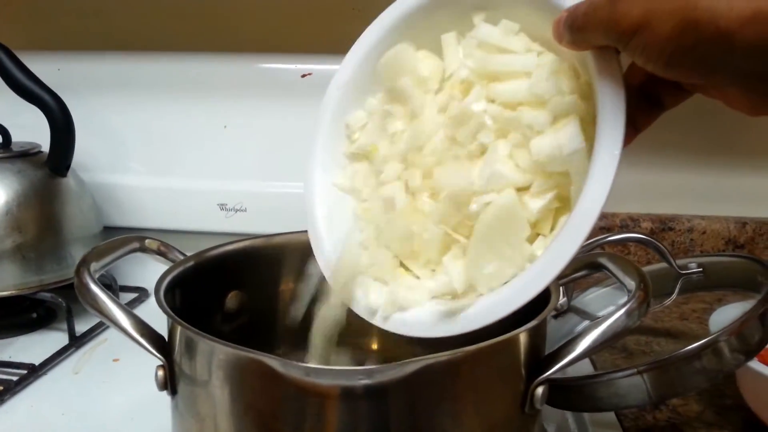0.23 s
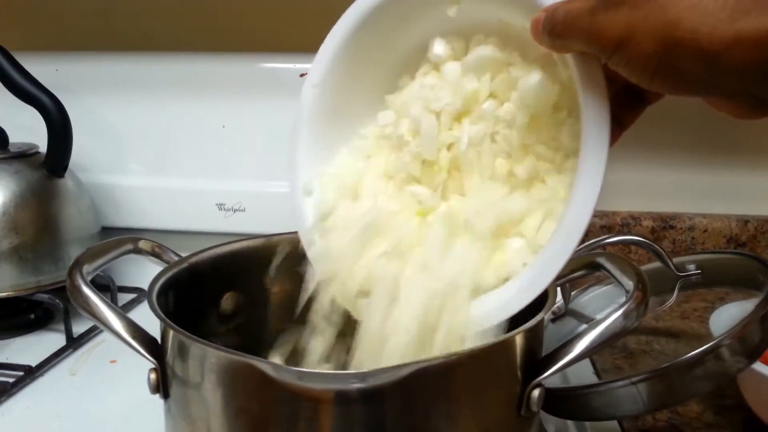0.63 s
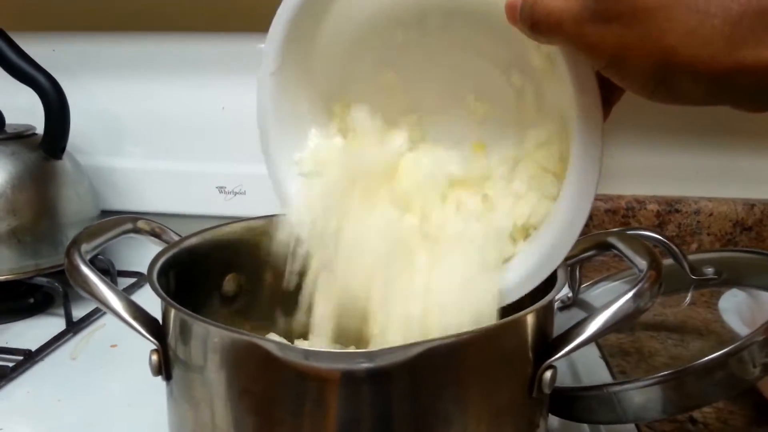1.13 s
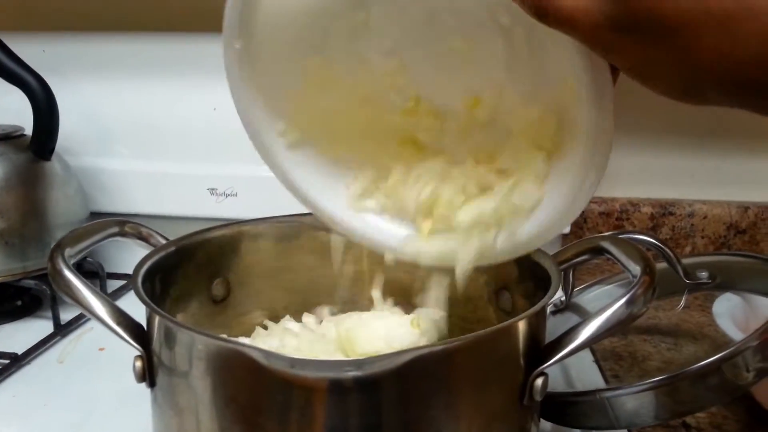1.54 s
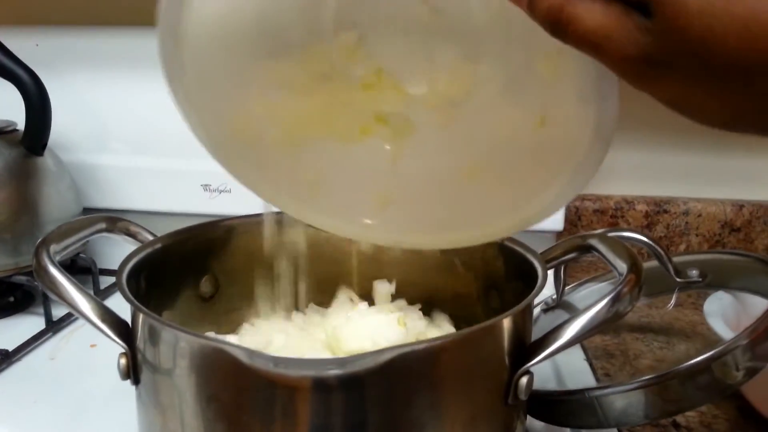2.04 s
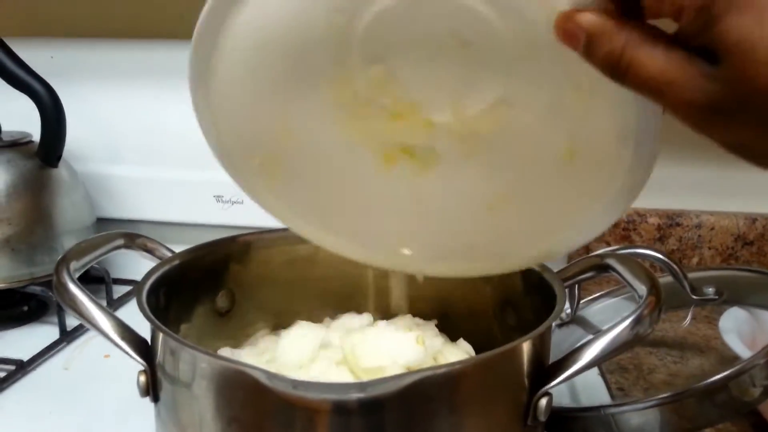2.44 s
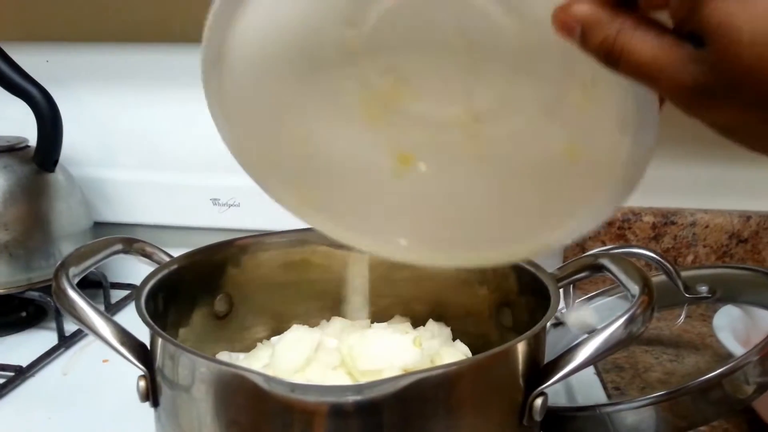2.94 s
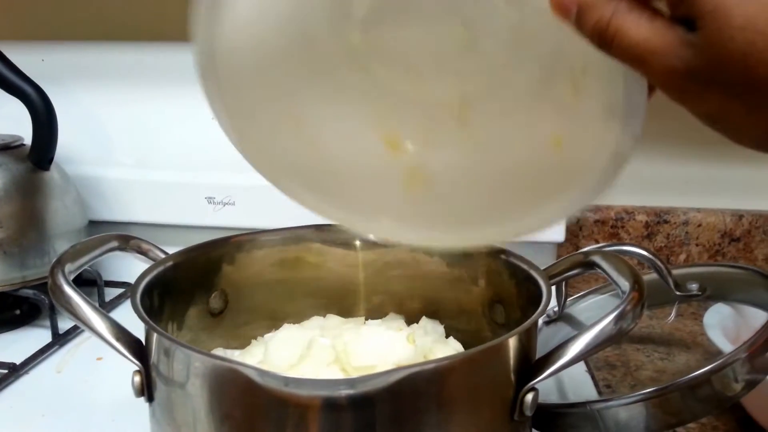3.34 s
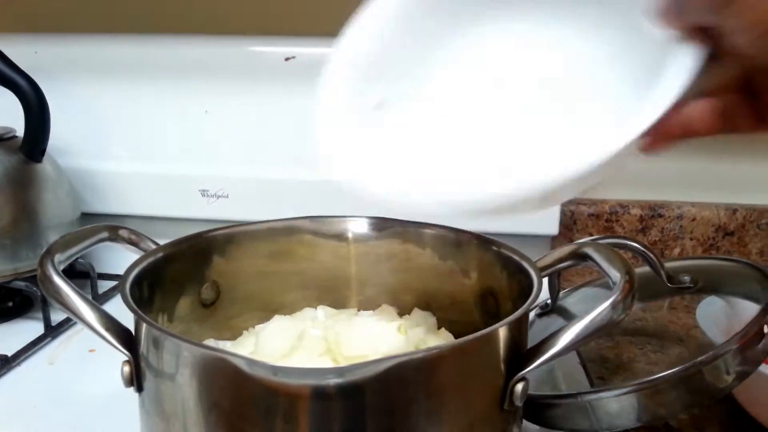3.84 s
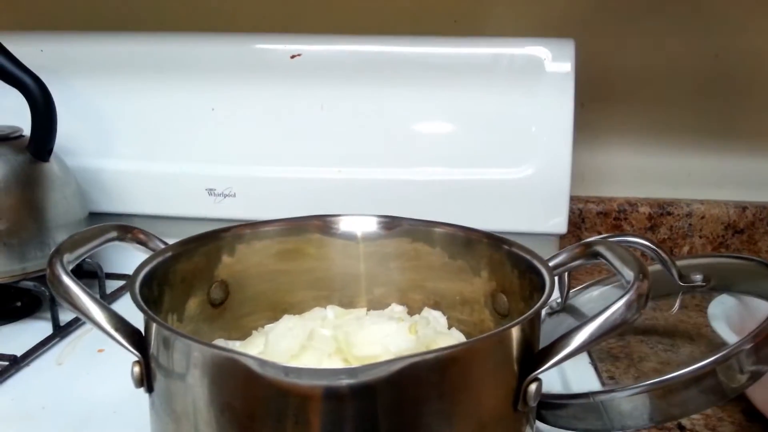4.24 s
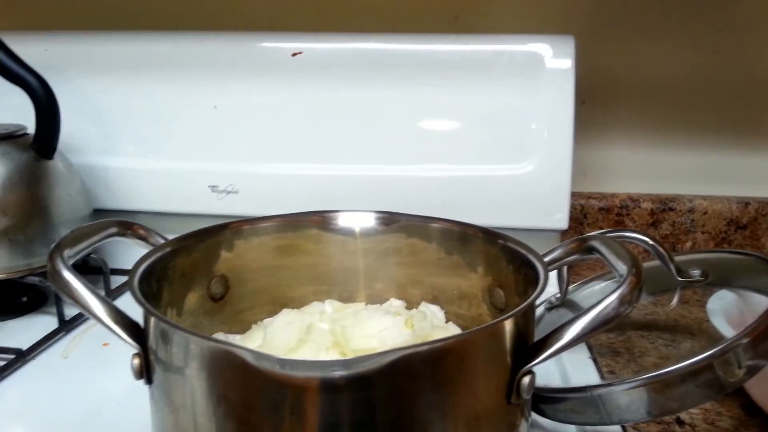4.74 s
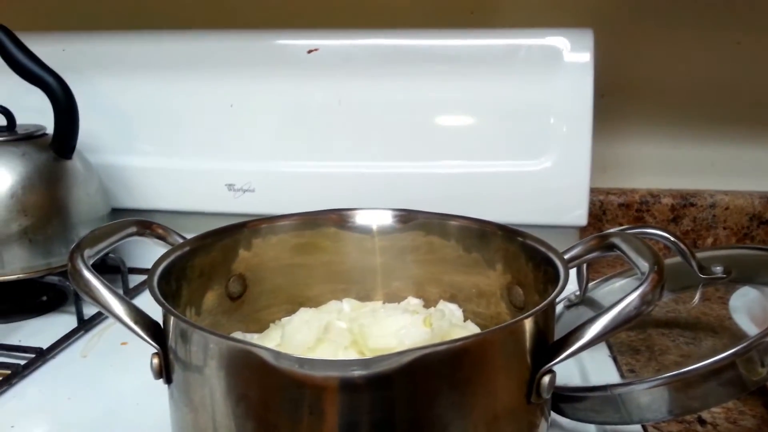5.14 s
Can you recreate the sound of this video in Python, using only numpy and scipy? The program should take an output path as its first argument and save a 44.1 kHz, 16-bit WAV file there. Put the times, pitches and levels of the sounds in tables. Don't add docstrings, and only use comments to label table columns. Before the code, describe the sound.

Close stereo recording in a reflective home kitchen. Onion pieces first tick and plop on bare steel, then fall in duller, softer clumps as the pot fills. Knuckles rap the plastic bowl briskly, very loud and cracking, slightly overloaded, with short room echo. Low hum and hiss remain alone for over a second, then the bowl's rim lands, bounces, drags and thumps on the counter.

```python
import sys
import numpy as np
from scipy import signal
from scipy.fft import rfft, irfft, next_fast_len
from scipy.io import wavfile

SR = 44100
rng = np.random.default_rng(int(sys.argv[2]) if len(sys.argv) > 2 else 0)


def voltage_ratio(decibels):
    exponent = np.asarray(decibels, float) / 20
    return 10 ** exponent


def unload_audio(sound):
    columns = np.transpose(np.atleast_2d(sound))
    steps = np.round(np.clip(columns, -1, 1) * 32767)
    wavfile.write(sys.argv[1], SR, steps.astype(np.int16))


N = 236891
TIME = np.arange(N) / SR

# centre_hz, t60_s, level_db, left_right_likeness (0-1)
ROOM = [(109, 0.63, -39.5, 0.91), (270, 0.67, -33, 0.91), (615, 0.54, -28, 0.58), (1160, 0.3, -29, 0),
        (2580, 0.39, -35.5, 0), (5040, 0.28, -32, 0), (10600, 0.2, -31, 0.08)]


def table(hz, rows, column):
    rows = np.array(rows, float)
    return np.interp(np.log(np.maximum(hz, 1)), np.log(rows[:, 0]), rows[:, column])


def unit(x):
    return x / np.sqrt(np.mean(x ** 2))


def band(x, low_hz, high_hz):
    sos = signal.butter(2, [low_hz, min(high_hz, .45 * SR)], "band", fs=SR, output="sos")
    return signal.sosfilt(sos, x)


def add(out, s, sound, db, pan_db=0):
    i = max(int(s * SR), 0)
    n = min(sound.shape[1], N - i)
    out[:, i:i + n] += sound[:, :n] * voltage_ratio(db + np.array([[pan_db], [-pan_db]]) / 2)


def swell(s, db, rise_s, fall_s, hold_s=0):
    before = (s - TIME) / rise_s
    after = (TIME - s - hold_s) / fall_s
    return voltage_ratio(db - 60 * np.maximum(np.maximum(before, after), 0))


def ring(modes, seconds, scatter_db, turn, rise=0.00052):
    hz, db, t60 = np.array(modes, float).T[:, :, None]
    detune, scatter = rng.standard_normal((2, len(hz), 1))
    t = np.arange(int(seconds * SR)) / SR
    phase = 2 * np.pi * hz * (1 + 0.006 * detune) * t
    place = np.arange(len(hz))[:, None]
    decay = voltage_ratio(db + scatter_db * scatter - 60 * t / np.maximum(t60, .003))
    size = (-1.) ** place * decay * np.minimum(t / rise, 1)
    shift = turn * np.cos(2.4 * place) * hz / 1000
    left = (size * np.sin(phase)).sum(0)
    right = (size * np.sin(phase + shift)).sum(0)
    return np.array([left, right])


def damped(peaks, sharpen):
    return [(hz, db, sharpen * np.log(1000) / np.pi / width) for hz, width, db in peaks]


def puff(seconds, t60, low_hz, high_hz):
    t = np.arange(int(seconds * SR)) / SR
    return band(rng.standard_normal((2, len(t))) * voltage_ratio(-60 * t / t60), low_hz, high_hz)


def grains(per_s, spread_db, low_hz, high_hz, like):
    struck = rng.random((2, N)) < per_s / SR
    sizes = voltage_ratio(spread_db * np.minimum(rng.exponential(size=(2, N)), 3))
    hits = struck * sizes * rng.choice([-1, 1], (2, N))
    mid, side = band(band(hits, low_hz, high_hz), low_hz, high_hz)
    return unit(np.array([mid + (1 - like) * side, mid - (1 - like) * side]))


def two_ears(mid, side, like):
    return np.sqrt(1 + like) * mid + np.sqrt(1 - like) * side * np.array([[1], [-1]])


def knocks(damping):
    # start_s, peak_db, left_minus_right_db
    blows = [
        (1.477, -22, 2),
        (2.17, -16, 3.5),
        (2.4385, -3, 1),
        (2.5989, -1, 2),
        (2.776, -2.5, 1),
        (2.937, -0.5, 1),
        (3.1, 0.5, 1.5),
        (3.26, 2.5, 1.5),
        (3.456, 2, 2),
    ]
    # pitch_hz, level_db, t60_s
    bowl = [(690, -8, 0.021), (834, -14, 0.055), (902, 5, 0.023), (1012, 6, 0.032), (1256, -1.5, 0.069),
            (1384, -1, 0.032), (1725, 7.5, 0.03), (2030, -4.5, 0.036), (2382, 5.5, 0.02), (2830, -1, 0.025),
            (3160, 1, 0.023), (3693, 1, 0.016), (4010, -2.5, 0.017), (4280, -1.5, 0.017),
            (4570, 2.5, 0.017), (5180, -4.5, 0.0099), (6130, -24, 0.006), (7300, -10.5, 0.029),
            (8220, -3, 0.014), (8910, -12, 0.034)]
    # pitch_hz, level_db, t60_s
    pot = [(236, -15, .2), (300, -19, .18), (322, -19, .18), (505, -12, .2), (573, -10, .2), (646, -13, .3),
           (790, -14, .15), (899, -11, .16), (1015, -11, .15), (1244, -1, .15), (1368, -11, .14),
           (1700, -12, .14), (2330, -17, .12), (2860, -18, .12), (4590, -18, .12)]
    cavity = [(208, 1.5, 0.024), (293, -0.5, 0.029), (432, -7.5, 0.022), (550, -6.5, 0.032)]
    modes = np.array(bowl) * [1, 1, 1 / damping] + [0, 10 * np.log10(damping), 0]
    out = np.zeros((2, N))
    for s, db, pan_db in blows:
        shell = ring(modes, 0.102, scatter_db=2.0, turn=0.75)
        thump = ring(cavity, 0.13, scatter_db=2, turn=0.14, rise=0.0023)
        crack = puff(.04, 0.019, 2600, 10200)
        song = ring(pot, .5, scatter_db=1.0, turn=1.5, rise=0.0047)
        add(out, s, shell, db - 12.0, pan_db)
        add(out, s, thump, 0.84 * db - 16.5)
        add(out, s, crack, db - 9, pan_db)
        add(out, s + 0.004004, song, 1.6 * db - 23)
    return out


def pieces():
    # start_s, peak_db, pitch_hz
    plops = [(0.041, -21.5, 567), (0.0615, -15, 592), (0.097, -20, 970), (0.13, -12.5, 970),
             (0.169, -19, 940), (0.18, -18.5, 996), (0.289, -30, 650), (0.31, -23.5, 568),
             (0.374, -25, 590), (0.403, -17.5, 1290), (0.428, -22.5, 640), (0.486, -22.5, 944),
             (0.522, -24, 1210), (0.539, -26.5, 1075), (0.632, -21, 650), (0.659, -20, 636),
             (0.845, -27.5, 1100), (0.88, -22, 770), (0.924, -16.5, 656), (1.061, -27, 607),
             (1.222, -29.5, 538), (1.296, -32, 496), (1.575, -37, 575), (2.355, -33, 614)]
    # start_s, peak_db,
    # pitch_hz
    ticks = [(0.097, -23.5, 2080), (0.131, -26, 3850), (0.168, -35, 2170), (0.18, -36, 3160),
             (0.215, -37, 2860), (0.232, -32, 2680), (0.29, -35, 2006), (0.374, -42, 1970),
             (0.403, -27.5, 2650), (0.429, -27.5, 2560), (0.459, -35.5, 2780), (0.486, -34, 2010),
             (0.521, -34, 2030), (0.541, -37, 1960), (0.589, -34, 2000), (0.615, -32, 2030),
             (0.632, -31, 2500), (0.659, -30, 2550), (0.845, -39, 1970), (0.881, -41, 2300),
             (0.922, -39, 2980), (1.198, -43, 2220), (1.221, -40, 2420), (1.296, -49, 3050),
             (1.349, -50, 2250), (1.477, -27, 3900), (1.549, -42, 3760), (1.664, -41.5, 2010),
             (1.769, -40.5, 2820), (2.355, -53, 2500)]
    # start_s, peak_db, low_hz, upper_hz
    clumps = [
        (0.631, -23, 197, 300),
        (0.644, -29, 185, 300),
        (0.687, -35, 244, 386),
        (0.918, -21.5, 182, 290),
        (0.943, -23, 182, 310),
        (0.986, -39, 215, 270),
        (1.02, -31, 178, 361),
        (1.073, -40, 184, 355),
    ]
    # pitch_hz, level_db, t60_s
    floor = [(549, -4.5, 0.084), (982, 8.5, 0.073), (1195, 7.5, 0.033), (2040, 2, 0.14), (2800, -20, 0.081),
             (3063, -9, 0.31), (3740, -26, 0.067), (4380, -7.5, 0.13), (5700, -30, .07)]
    out = np.zeros((2, N))
    for s, db, hz in plops:
        plop = ring([(hz, 0, .007 + 9 / hz)], .1, scatter_db=0, turn=.4, rise=1.5 / hz)
        add(out, s, plop, db + 3)
    for s, db, hz in ticks:
        edge = ring([(hz, 0, .03), (1.06 * hz, -5, .025)], .1, scatter_db=0, turn=.3)
        steel = ring(floor, .2, scatter_db=4, turn=.5)
        add(out, s, edge, db + 1.5)
        add(out, s, puff(0.03, 0.03, 1700, 6000), db - 4)
        add(out, s, steel, 0.48 * db - 24.5 - 10 * s)
    for s, db, low_hz, upper_hz in clumps:
        air = [(low_hz, -5, .07), (upper_hz, -3, .06)]
        add(out, s, ring(air, .2, scatter_db=1.5, turn=.3, rise=0.0028), db + 2)
    return out


def pour():
    # peak_s, patter_db, fall_s, rustle_above_patter_db
    slides = [(0.002, -32.5, 0.036, -25), (0.14, -37, 0.93, -8), (0.225, -41, 0.35, -29),
              (0.414, -35.5, 0.28, -26), (0.531, -35, 0.31, -12), (0.637, -26, 0.46, -10),
              (0.729, -48, 0.38, 7.5), (0.879, -32.5, 0.16, -15), (0.927, -30, 0.38, -11),
              (1.17, -44, 0.41, -6), (1.225, -44, 0.42, -9), (1.298, -54, 0.87, 3),
              (1.666, -46.5, 0.14, -6)]
    rise_s = .045
    thud, patter, rustle = np.zeros((3, N))
    for s, db, fall_s, wet_db in slides:
        thud += swell(s, 3 + 1.37 * db, rise_s, 1.93 * fall_s)
        patter += swell(s, db, rise_s, fall_s)
        rustle += swell(s, db + wet_db, 1.1 * rise_s, 0.55 * fall_s)
    out = voltage_ratio(-2.5) * thud * grains(400, 2.5, 167, 644, like=0.94)
    out += voltage_ratio(-2.5) * patter * grains(900, 2.3, 450, 3750, like=0.084)
    out += voltage_ratio(-2.0) * rustle * grains(2400, 2.5, 2400, 12300, like=.1)
    squelch = swell(1.786, -41, rise_s=0.13, fall_s=0.081)
    return out + squelch * grains(2500, 1.5, 2200, 7200, like=0.23)


def set_down():
    # start_s, peak_db, thump_db, clack_db
    contacts = [
        (4.909, -4, -20.5, -17.5),
        (4.9155, -21, -32, -14),
        (4.922, -19, -18, -18),
        (4.967, -13, -19, -13),
        (4.994, -20, -21, -15),
        (5.196, -21.5, -10, -4.5),
        (5.228, -19, -28, -13),
        (5.241, -28, -4, -27),
        (5.275, -43, -3, 2),
    ]
    # centre_hz, width_hz, level_db
    rim = [(462, 59, -9), (650, 180, -11), (960, 128, 2.5), (1520, 170, 7.5), (1603, 187, 13),
           (2170, 127, 3.5), (2440, 180, 4.5), (2680, 340, -23), (3390, 140, -3), (4170, 680, -2.5)]
    plate = [(105, 0.5, 0.059), (142, -2.0, 0.1), (215, -3.2, 0.13)]
    out = np.zeros((2, N))
    for s, db, thump_db, clack_db in contacts:
        edge = ring(damped(rim, 0.83), .1, scatter_db=2.0, turn=0.59)
        thump = ring(plate, .25, scatter_db=3, turn=.3, rise=0.0031)
        clack = band(puff(0.034, 0.038, 1300, 4200), 1100, 5000)
        click = ring([(2250, 0, 0.0073)], .03, scatter_db=3, turn=.3, rise=0.00022)
        add(out, s + .001, edge, db - 10, 1.5)
        add(out, s + 0.0033, thump, db + thump_db)
        add(out, s + 0.00137, clack, db + clack_db + 2.0)
        add(out, s + 0.001006, click, db + clack_db + 7)
    scrape = swell(5.195, -36, rise_s=.2, fall_s=.1, hold_s=.09)
    boom = swell(5.23, -33.5, rise_s=.2, fall_s=.1, hold_s=.054)
    out += voltage_ratio(-0.5) * scrape * grains(640, 3.8, 700, 2750, like=0.17)
    return out + voltage_ratio(-6.5) * boom * grains(351, 2.0, 59, 310, like=0.59)


def kitchen(dry):
    t = np.arange(int(.7 * SR)) / SR
    echo = 0
    for hz in 70 * 2 ** np.arange(0, 8, .5):
        noise = rng.standard_normal((2, 2, 1, len(t)))
        mid, side = unit(band(noise, hz / 1.207, hz * 1.172)) * np.sqrt(hz / SR)
        pair = two_ears(mid, side, table(hz, ROOM, 3))
        echo = echo + pair * voltage_ratio(table(hz, ROOM, 2) - 60 * t / table(hz, ROOM, 1))
    build_up = np.clip((t - .003) / .005, 0, 1)
    early = 1 + np.exp(-t / 0.011)
    here, there = echo * build_up * early
    angle = 0.87 * TIME
    wet = signal.fftconvolve(dry * np.cos(angle), here, axes=1)
    wet += signal.fftconvolve(dry * np.sin(angle), there, axes=1)
    return wet[:, :N]


def hum():
    # pitch_hz, density_db
    drone = [(13, -84), (22, -34), (80, -27.5), (103, -10.5), (151, -24), (200, -6), (266, -10.5),
             (354, -1), (385, -16), (404, -1.5), (447, -11), (529, -6.5), (751, -13.5), (1200, -19.5),
             (1560, -27), (2640, -120)]
    # centre_hz, width_hz, level_db
    resonances = [(350, 30, -5.5), (538, 12, 2), (2810, 130, -25), (4514, 72, -19.5), (4900, 82, -24.5)]
    # pitch_hz, density_db
    hiss = [(590, -22), (1000, -13.5), (1800, -8), (1930, -10.5), (2850, -11), (3430, -12.5), (5080, -12.5),
            (5900, -18), (14000, -16.5), (14800, -25), (15700, -73.5)]
    hz = np.fft.rfftfreq(N, 1 / SR)
    mid, side = rfft(rng.standard_normal((2, N)))
    pair = two_ears(mid, side, table(hz, ROOM, 3))
    peaks = np.sqrt(sum(voltage_ratio(db) ** 2 / (1 + (2 * (hz - f) / w) ** 2) ** 2 for f, w, db in resonances))
    layers = [(-43.5, voltage_ratio(table(hz, drone, 1))), (-50.5, peaks), (-53, voltage_ratio(table(hz, hiss, 1)))]
    power = sum((voltage_ratio(db) * unit(shape)) ** 2 for db, shape in layers)
    return irfft(pair * np.sqrt(power / 2), N)


def scene():
    counter, onion = set_down(), pieces() + pour()
    wet = kitchen(knocks(damping=4.17) + voltage_ratio(-4.5) * counter + voltage_ratio(-9) * onion)
    near = knocks(damping=0.81) + counter + onion + wet
    no_bass = signal.butter(4, 75, "high", fs=SR, output="sos")
    return signal.sosfilt(no_bass, near) + hum()


def band_limit(x):
    return signal.sosfilt(signal.butter(12, 15870, fs=SR, output="sos"), x)


def record(dry):
    # pitch_hz, left_minus_right_db
    balance = [(60, 0), (110, 0.5), (200, 0.5), (380, -0.5), (700, 2.5), (1290, -1.5), (2380, 1.5),
               (4400, -3.5), (8120, -3.5), (15000, -4)]
    clip = .92
    size = next_fast_len(N)
    lean_db = table(np.fft.rfftfreq(size, 1 / SR), balance, 1) * np.array([[.5], [-.5]])
    x = irfft(rfft(dry, size) * voltage_ratio(lean_db), size)[:, :N]
    soft = signal.sosfilt(signal.ellip(6, .2, 45, 14550, fs=SR, output="sos"), x)
    clipped = np.clip(soft, -clip, clip)
    mix = signal.sosfilt(signal.ellip(8, .2, 60, 15800, fs=SR, output="sos"), clipped)
    return band_limit(mix)


dry = scene()
out = record(dry)
unload_audio(out)
```